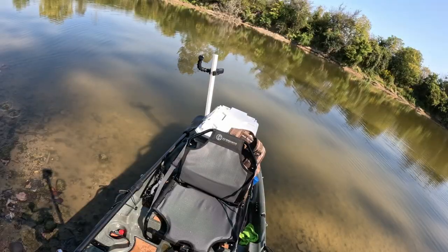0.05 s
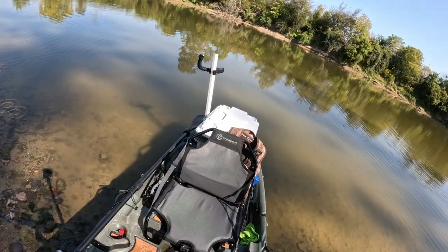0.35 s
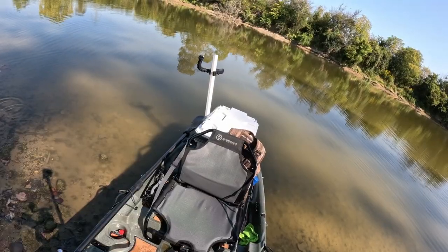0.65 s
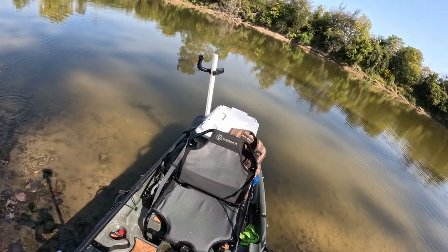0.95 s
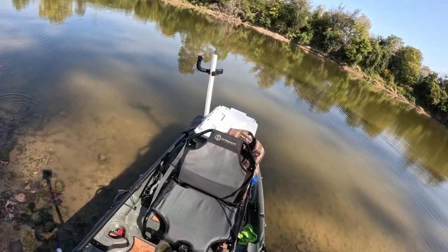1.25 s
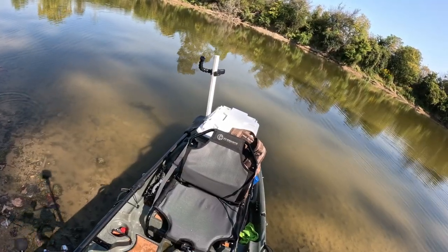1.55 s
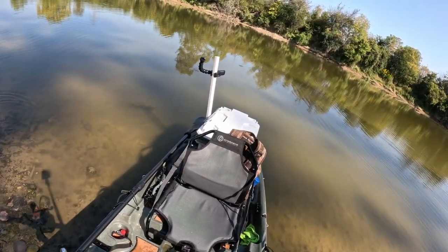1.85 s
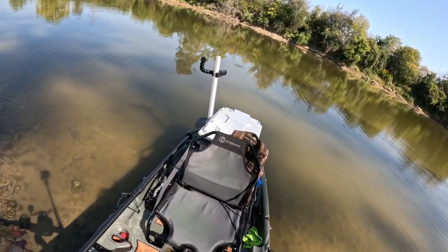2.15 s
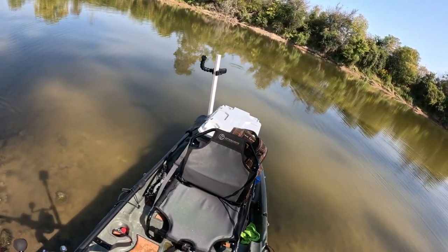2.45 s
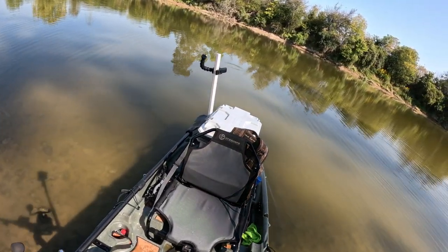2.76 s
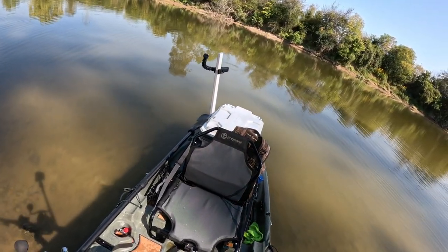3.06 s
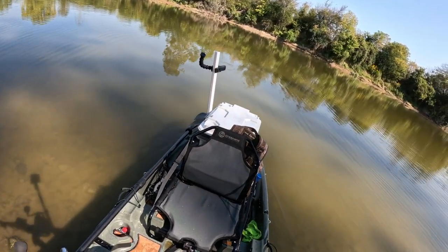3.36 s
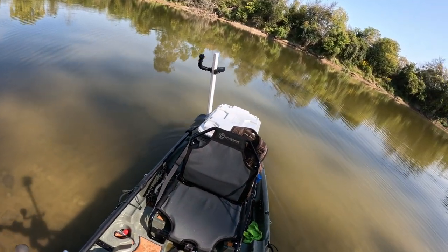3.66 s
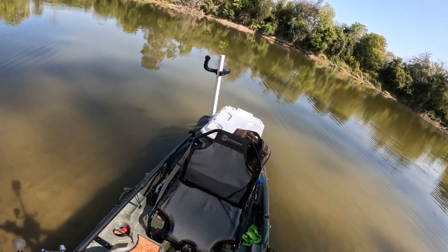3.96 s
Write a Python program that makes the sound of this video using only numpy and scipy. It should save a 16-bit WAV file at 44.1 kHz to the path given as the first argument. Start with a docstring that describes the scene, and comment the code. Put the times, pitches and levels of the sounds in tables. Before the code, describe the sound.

A plastic kayak hull scrapes and knocks over gravel and stones in shallow water.

```python
"""A plastic kayak slides off a gravel bank through shallow water, heard from on board.
It opens on a stone's knock and a boom of the hollow shell; a bump on the deck and a drip lead into a lull.
After a second the hull drags on: gravel grinds, pebbles crack, sand and water fizz along the keel.
In the second half stones knock and judder hardest, and the whole shell booms as it drops off them.
A low rumble and a steady high hiss lie under it all."""
import sys
import numpy as np
from scipy import signal
from scipy.fft import rfft, irfft
from scipy.io import wavfile
from scipy.ndimage import uniform_filter1d

SR = 44100
rng = np.random.default_rng(int(sys.argv[2]) if len(sys.argv) > 2 else 0)


def persist_wave(psi):
    """Save psi, clipped to +-1, as 16-bit WAV."""
    counts = np.round(np.clip(psi, -1, 1) * 32767).astype(np.int16)
    wavfile.write(sys.argv[1], SR, np.atleast_2d(counts).T)


N = 176400

# stones striking the hull: (time [s], level [dB], brightness [Hz], rattle fade [s])
STONE_HITS = [(.002, -27, 1920, 0.012), (.066, -48.5, 2400, 0.017), (0.262, -44.5, 2400, 0.0068),
              (1.519, -40, 1500, 0.0046), (1.639, -48, 1700, 0.0022), (2.522, -18, 970, 0.017),
              (2.573, -22.5, 1080, 0.0076), (2.862, -36.5, 920, 0.0082), (3.057, -31.5, 800, 0.023),
              (3.177, -16, 1410, 0.012), (3.632, -46, 866, 0.0038), (3.823, -29.5, 860, 0.0065),
              (3.93, -27, 1070, 0.03)]
# stones juddering along the hull: (peak time [s], level [dB], brightness [Hz], fade [s])
STONE_SCUFFS = [(1.137, -51.5, 760, 0.012), (1.197, -52, 1360, 0.011), (1.583, -27.5, 256, 0.013),
                (1.897, -27.5, 250, 0.0069), (2.062, -32.5, 785, 0.022), (2.29, -31.5, 885, 0.0082),
                (2.435, -34, 1460, 0.022), (2.536, -22, 317, 0.009), (2.581, -30, 597, 0.036),
                (3.098, -22, 840, 0.011), (3.146, -20.5, 790, 0.0089), (3.215, -17.5, 1040, 0.013),
                (3.243, -19, 810, 0.013), (3.306, -25, 910, 0.012), (3.417, -23.5, 970, 0.047),
                (3.502, -23, 252, 0.0168), (3.526, -26, 313, 0.04), (3.814, -37, 790, 0.017),
                (3.894, -34.5, 816, 0.0036), (3.953, -21.5, 504, 0.04)]
# the hull dropping off a stone: (time [s], level [dB], push length [s])
HULL_DROPS = [(.003, -30.5, 0.0085), (1.075, -34.5, 0.015), (2.311, -38, 0.0034), (2.615, -29, 0.008),
              (3.153, -27, 0.0015), (3.268, -31.5, 0.0031), (3.495, -22.5, 0.012), (3.868, -28.5, 0.01)]
# pebbles cracking against each other: (time [s], level [dB], fade [s])
PEBBLE_CRACKS = [(.002, -28.5, 0.0044), (0.025, -49.5, 0.033), (1.395, -46, 0.0073), (1.519, -38.5, 0.0031),
                 (1.549, -42.5, 0.0093), (1.578, -36, 0.0079), (1.639, -40.5, 0.0058),
                 (1.945, -38.5, 0.0093), (2.288, -32.5, 0.0087), (2.296, -34.5, 0.0065),
                 (2.431, -32, 0.0072), (3.273, -38.5, 0.015), (3.43, -36, 0.036), (3.52, -32.5, 0.01),
                 (3.539, -32.5, 0.007)]
# the hollow deck bumped, then settling: (time [s], level [dB])
DECK_THUDS = [(0.2655, -30), (0.29, -35)]
# drips beside the hull: (time [s], level [dB], pitch [Hz])
DRIPS = [(0.458, -56, 1630), (3.655, -45, 1920)]

# fader curves of the hull's drag, the gravel and the wet sand: (time [s], level [dB])
DRAG_FADER = [(0, -29), (.2, -52.5), (.9, -58.5), (1.12, -46), (1.4, -42.5), (1.58, -31), (1.73, -40.5),
              (1.89, -32), (2.2, -36.5), (2.3, -30.5), (2.47, -35.5), (2.58, -27), (2.68, -28.5),
              (2.82, -36.5), (3.02, -26.5), (3.23, -22.5), (3.38, -30), (3.52, -34.5), (3.66, -39),
              (4, -60)]
GRAVEL_FADER = [(0, -34), (.08, -55), (.2, -74), (1, -68), (1.25, -56.5), (1.51, -43), (1.58, -37.5),
                (1.73, -47.5), (1.9, -39.5), (2.2, -43.5), (2.31, -30.5), (2.38, -40), (2.6, -35.5),
                (2.77, -37.5), (2.82, -48), (3.02, -38.5), (3.2, -29), (3.35, -44.5), (3.48, -25.5),
                (3.62, -50.5), (3.78, -50), (4, -36)]
SAND_FADER = [(0, -77), (.09, -61), (.15, -69), (1.24, -77.5), (1.4, -53.5), (1.58, -60), (1.72, -56),
              (1.95, -51.5), (2.25, -49), (2.29, -40), (2.37, -48), (2.44, -45), (2.48, -46), (3.35, -50),
              (3.45, -47), (3.6, -49.5), (3.8, -59.5), (4, -49)]

# resonances of the hull panels, whole shell and deck: (pitch [Hz], level [dB], ring time to -60 dB [s])
PANEL_MODES = [(123.8, -6, 0.27), (155.2, -1, 0.21), (214, 1, 0.051), (276, -6, 0.097), (411, -2, 0.016),
               (475, -16, 0.043), (552, -5.5, 0.091), (607, -3.5, 0.095), (785, 5, 0.064), (894, 3, 0.061),
               (933, -1.5, 0.12), (1006, 3, 0.037), (1113, -10.5, 0.095), (1280, 0, 0.049),
               (1530, -0.5, 0.046), (1860, -14.5, 0.11)]
SHELL_MODES = [(56.7, 1, 0.94), (97.5, -0.5, 0.073), (150.9, 1.5, 0.4), (233, -3, 0.14)]
DECK_MODES = [(157.4, -4, 0.18), (285, -2.5, 0.12), (390, 2.5, 0.12), (445, -0.5, 0.076)]
# decay of the hull's dense minor modes: (frequency [Hz], ring time to -60 dB [s])
MINOR_DECAY = [(60, 0.52), (300, 0.12), (1000, 0.044), (3000, 0.024), (10000, 0.0058)]

# EQ curves that colour the minor modes and each texture: (frequency [Hz], relative gain [dB])
MINOR_EQ = [(30, -9.5), (100, -8), (300, -2), (450, -5), (600, -1.5), (690, -4), (800, -2.5), (1250, -5.5),
            (1550, -11), (2500, -8.5), (5000, -22.5), (12000, -24)]
DRAG_EQ = [(20, -21), (50, 2), (100, 6), (155, -2), (230, 0), (420, -8), (800, -25), (3000, -74)]
GRAVEL_EQ = [(40, 14), (150, -7.5), (230, -4), (400, 5.5), (620, 0), (950, -5), (1400, -3.5), (2500, -8.5),
             (5000, -9.5), (12000, -28.5)]
CRACK_EQ = [(200, -13), (1000, 17), (1600, 13), (2700, 4), (4500, -3), (6000, -8.5), (9000, -19),
            (11000, -19.5), (12500, -48)]
SAND_EQ = [(100, -10.5), (700, 16), (1600, 12.5), (2500, 4), (4000, 2.5), (5500, -2), (8000, -3.5),
           (9200, -15.5), (11000, -14), (13000, -74)]
HISS_EQ = [(500, -24.5), (1400, -7.5), (2500, -42), (3000, -9), (3500, -4), (4200, -2), (5000, -31),
           (5600, -5), (6300, 3), (7200, 10), (7800, 2.5), (8400, -10), (9000, -44), (11000, -32.5),
           (13000, -56)]
RUMBLE_EQ = [(28, -12), (42, 11.5), (55, -2.5), (75, -0.5), (105, -6.5), (160, -18), (300, -21),
             (500, -33.5), (1000, -63), (3000, -57.5)]

# stereo width: (frequency [Hz], side against mid [dB])
STEREO_WIDTH = [(55, -32.5), (150, -62), (400, -17.5), (1000, -24), (2700, -9), (4700, -25.5), (6800, -5.5),
                (8500, -11)]
# stereo lean: (frequency [Hz], left over right [dB])
LEFT_LEAN = [(400, -0.5), (2500, 2.5), (5000, 0.3)]

SLIPS_PER_S, RATTLE_DB, SCUFF_RISE_RATIO = 700, 2.5, 0.61
SPOT_SPREAD_DB, HULL_MINOR_DB, DECK_MINOR_DB = 2.1, 2.5, -3.5
HISS_DB, RUMBLE_DB = -56, -42


def stone_hits():
    """Each stone gives the hull a sharp blow, then rattles on."""
    out, t = np.zeros(N), np.arange(SR // 2) / SR
    for s, db, bright_hz, fade_s in STONE_HITS:
        rattle = contacts(SLIPS_PER_S, count=len(t)) * np.exp(-t / fade_s)
        rattle = amp(RATTLE_DB) * rattle / (np.linalg.norm(rattle) + .5)
        blow = rng.choice([-1, 1]) * (t == 0)
        add(out, s, knock(blow + rattle, db, bright_hz))
    return out


def stone_scuffs():
    """A run of tiny slips swells and fades as a stone passes under the hull."""
    out, t = np.zeros(N), np.arange(-SR // 10, SR // 2) / SR
    for s, db, bright_hz, fade_s in STONE_SCUFFS:
        rise_s = SCUFF_RISE_RATIO * fade_s
        swell = np.exp(np.where(t < 0, -(t / rise_s) ** 2 / 2, -t / fade_s))
        slips = swell * contacts(SLIPS_PER_S, count=len(t))
        add(out, s + t[0], knock(slips, db, bright_hz))
    return out


def knock(force, db, bright_hz, low_cut_hz=69.5):
    """The hull's answer to one contact, too small to move the whole shell; softer contacts are duller."""
    force = signal.sosfilt(signal.butter(2, low_cut_hz, "highpass", fs=SR, output="sos"), force)
    force = signal.sosfilt(signal.butter(4, bright_hz, fs=SR, output="sos"), force)
    body = hull(force)
    return amp(db) * np.sqrt(.03 * SR) * body / np.linalg.norm(body)  # the energy of 30 ms at this level


def hull(force):
    """The hull rings in its panels and minor modes; each spot struck favours other panels."""
    panels = [(hz, db + SPOT_SPREAD_DB * rng.standard_normal(), t60) for hz, db, t60 in PANEL_MODES]
    body = ring(panels) + amp(HULL_MINOR_DB) * minor_modes()
    return signal.fftconvolve(force, body)[:len(force)]


def minor_modes():
    """The hull's many minor modes: a short, noisy tail whose treble dies first."""
    hz, t, spectrum = signal.stft(rng.standard_normal(SR // 2), SR, nperseg=256)
    decay = amp(-60 * t / curve_at(MINOR_DECAY, hz)[:, None])
    tail = signal.istft(spectrum * decay, SR, nperseg=256)[1]
    tail = colour(np.pad(tail, (0, SR - len(tail))), MINOR_EQ)
    return tail / np.linalg.norm(tail)


def shell_booms():
    """Dropping off a stone, the hull takes a slow push that sets the whole shell flexing."""
    out = np.zeros(N)
    for s, db, push_s in HULL_DROPS:
        add(out, s, amp(db) * push(ring(SHELL_MODES), push_s, head=SR // 10))
    return out


def hull_drag():
    """The loaded hull sticks and slips on the bed in soft, low bumps."""
    bumps = contacts(per_s=300, spread_db=2.5)
    return fader(DRAG_FADER) * colour(hull(bumps), DRAG_EQ)


def gravel_grind(catch_s=0.026, catch_db=1.5):
    """Pebbles tick against the hull, in clumps as the keel catches and lets go."""
    span = int(catch_s * SR)
    wander = uniform_filter1d(rng.standard_normal(N), span)
    catches = unit(uniform_filter1d(wander, span // 2))
    ticks = amp(catch_db * catches) * contacts(per_s=400, spread_db=2)
    return fader(GRAVEL_FADER) * colour(hull(ticks), GRAVEL_EQ)


def pebble_cracks(attack_s=.0003):
    """A pinched pebble lets go in a brief spray of grains."""
    out, t = np.zeros(N), np.arange(SR // 5) / SR
    for s, db, fade_s in PEBBLE_CRACKS:
        spray = colour(contacts(per_s=1300, spread_db=-5, count=len(t)), CRACK_EQ)
        envelope = (1 - np.exp(-t / attack_s)) * np.exp(-t / fade_s)
        add(out, s, amp(db) * envelope * spray)
    return out


def deck_thuds():
    """A soft blow on the hollow deck gives a tight, low note, blurred by the hull's minor modes."""
    out = np.zeros(N)
    for s, db in DECK_THUDS:
        body = ring(DECK_MODES) + amp(DECK_MINOR_DB) * minor_modes()
        add(out, s, amp(db) * push(body, push_s=0.0014, head=SR // 20))
    return out


def sand_fizz():
    """Fine grains and water fizz along the keel."""
    return fader(SAND_FADER) * colour(contacts(per_s=2200), SAND_EQ)


def drips(attack_s=0.0017, gap_s=.0028, detune=0.12):
    """A drip traps a quick cluster of five small bubbles of unlike size, each ringing very briefly."""
    out, t = np.zeros(N), np.arange(SR // 20) / SR
    envelope = t / attack_s * np.exp(1 - t / attack_s)
    for s, db, hz in DRIPS:
        for k, (sharp, late) in enumerate(rng.uniform(-1.14, 1, size=(5, 2))):
            bubble = envelope * np.sin(2 * np.pi * hz * (1 + detune * sharp) * t)
            add(out, s + (k + late / 2) * gap_s, amp(db) * bubble)
    return out


def background():
    """A steady bed of high hiss and low rumble."""
    hiss = colour(rng.standard_normal(N), HISS_EQ)
    rumble = colour(rng.standard_normal(N), RUMBLE_EQ)
    return amp(HISS_DB) * hiss + amp(RUMBLE_DB) * rumble


def contacts(per_s, spread_db=0, count=N):
    """Randomly timed clicks; a spread makes their sizes uneven."""
    size = amp(spread_db * np.minimum(rng.exponential(1, count), 4))
    return size * rng.choice([-1, 1], count) * (rng.random(count) < per_s / SR)


def ring(modes):
    """A struck resonance: dying sines, together of unit energy."""
    t = np.arange(SR) / SR
    x = sum(amp(db - 60 * t / t60) * np.sin(2 * np.pi * hz * t) for hz, db, t60 in modes)
    return x / np.linalg.norm(x)


def push(body, push_s, head):
    """A smooth pulse of force rings a body; the first `head` samples come out at unit level."""
    progress = np.arange(head) / SR / push_s
    x = signal.fftconvolve(progress * np.exp(-np.pi * progress), body)
    return x / np.std(x[:head])


def colour(x, curve, size=8192):
    """Minimum-phase EQ, so attacks have no pre-ring; the result has rms 1."""
    hz = abs(np.fft.fftfreq(size, 1 / SR))
    log_gain = np.log(amp(curve_at(curve, hz)))
    response = np.exp(np.conj(signal.hilbert(log_gain)))
    taps = np.fft.ifft(response).real[:size // 2]
    with_preroll = np.r_[x[-size:], x]
    return unit(signal.fftconvolve(with_preroll, taps)[size:size + len(x)])


def equalise(x, curve):
    """Zero-phase EQ over the whole track."""
    return irfft(rfft(x) * amp(curve_at(curve, np.fft.rfftfreq(N, 1 / SR))), N)


def curve_at(points, hz):
    """Reads a curve on a log-frequency axis."""
    point_hz, value = np.transpose(points)
    return np.interp(np.log(hz + 1), np.log(point_hz + 1), value)


def fader(points):
    """Gain at every sample from a curve in dB."""
    return amp(np.interp(np.arange(N) / SR, *np.transpose(points)))


def add(mix, s, sound):
    """Mixes a sound in at time s."""
    part = mix[max(round(s * SR), 0):][:len(sound)]
    part += sound[:len(part)]


def amp(db):
    """Decibels to gain."""
    return 10 ** (np.asarray(db) / 20)


def unit(x):
    """Scales to rms 1."""
    return x / np.sqrt(np.mean(x ** 2) + 1e-20)


def layers():
    """One mono mix of all sources, with fresh random grain on every call."""
    return (stone_hits() + deck_thuds() + stone_scuffs() + gravel_grind() + hull_drag() + shell_booms()
            + sand_fizz() + pebble_cracks() + drips() + background())


def scene():
    """The image on board: near mono in the bass, wider in the treble, leaning left."""
    mid = layers()
    side = equalise(layers(), STEREO_WIDTH)
    left = equalise(mid + side, [(hz, db / 2) for hz, db in LEFT_LEAN])
    right = equalise(mid - side, [(hz, -db / 2) for hz, db in LEFT_LEAN])
    return np.array([left, right])


def record(dry, low_cut_hz=32.5, high_cut_hz=12200):
    """A gentle low cut trims the sub-bass; a steep high cut takes off the top treble."""
    x = signal.sosfilt(signal.butter(2, low_cut_hz, "highpass", fs=SR, output="sos"), dry)
    high_cut = signal.firwin(511, high_cut_hz, window=("kaiser", 9), fs=SR)
    return signal.oaconvolve(x, high_cut[None], "same")


dry = scene()
out = record(dry)
persist_wave(out)
```